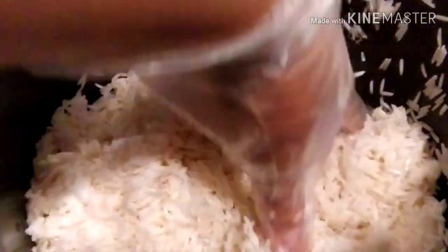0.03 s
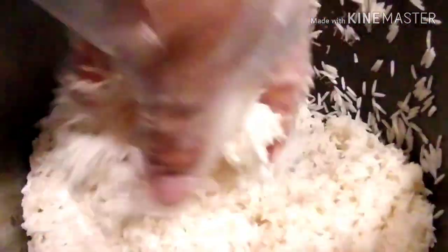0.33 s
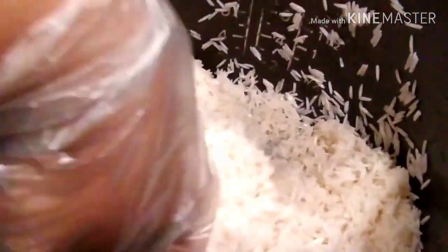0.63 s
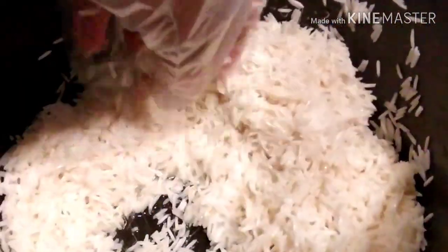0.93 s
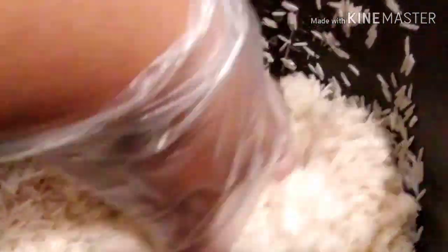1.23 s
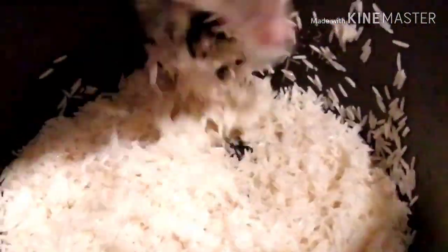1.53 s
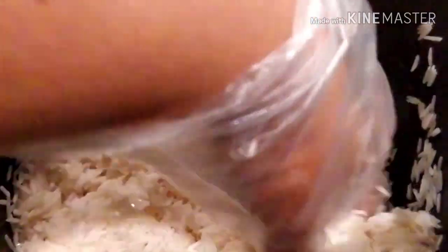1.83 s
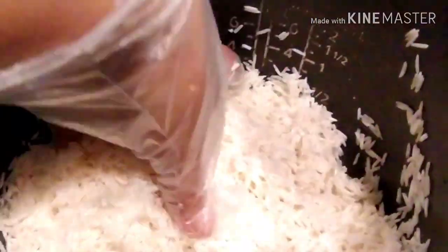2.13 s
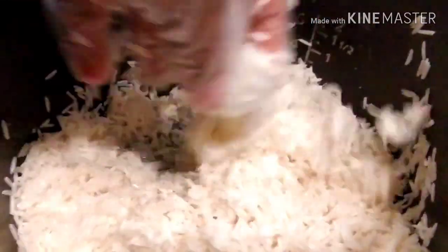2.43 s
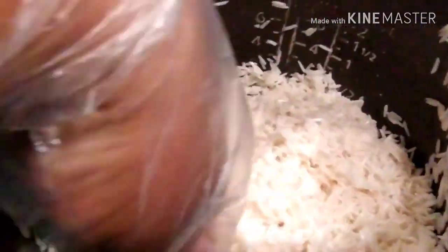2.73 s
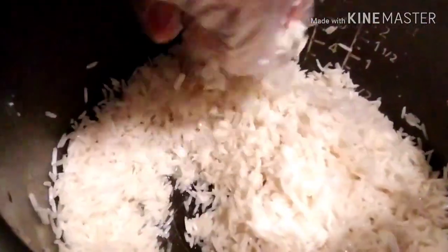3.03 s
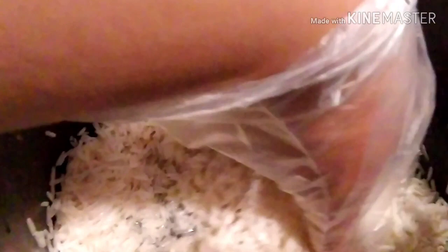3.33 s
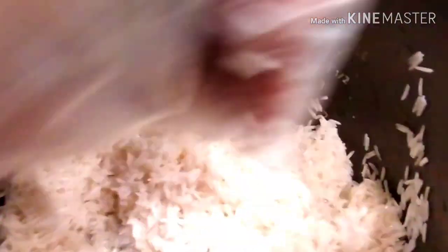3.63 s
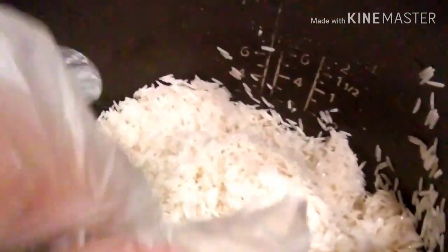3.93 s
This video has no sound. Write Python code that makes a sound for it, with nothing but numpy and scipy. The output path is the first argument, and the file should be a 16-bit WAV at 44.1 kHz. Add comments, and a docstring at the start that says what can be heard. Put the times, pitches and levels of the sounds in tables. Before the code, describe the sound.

Close to the microphone in a quiet room, dry rice hisses and crunches in a metal pot, stroke after stroke. The stirring hand's plastic glove crinkles and snaps, grains trickle down, and the pot occasionally gives a faint, hollow bump.

```python
"""A quiet room, close to a metal pot: a hand in a thin plastic glove stirs and scoops raw rice.
Pushed grains grind and sound the pot's hollow, lifted grains spill back and ring its wall,
glove and husks rustle. All three are dense streams of clicks, reflected inside the pot.
Now and then the hand bumps the pot, the glove snaps, or grains scrape over the metal."""
import sys
import numpy as np
from scipy import signal
from scipy.fft import rfft, irfft, next_fast_len
from scipy.io import wavfile

SR = 44100
rng = np.random.default_rng(int(sys.argv[2]) if len(sys.argv) > 2 else 0)


def generate_wav(signal):
    """Clip the signal to [-1, 1] and save it as 16-bit WAV at the path in sys.argv[1]."""
    frames = np.transpose(np.atleast_2d(signal))
    scaled = np.clip(frames, -1, 1) * 32767
    pcm = np.round(scaled).astype(np.int16)
    wavfile.write(sys.argv[1], SR, pcm)


N = 176400

# one list per hand stroke, before trim: t/s, grind/dB, spill/dB, rustle/dB, rustle left-right/dB
HAND_STROKES = [
    [(0.0, -49.5, -43.5, -31.5, -3), (0.13, -43.5, -44.5, -29.5, -3.0), (0.16, -45.5, -48, -36.5, 1),
     (0.17, -43.5, -45, -33, -4), (0.216, -44.5, -43.5, -31.5, 0), (0.272, -46.5, -47, -36.5, 1),
     (0.278, -49.5, -44, -34, -5), (0.33, -49, -48, -41, -6)],
    [(0.35, -53.5, -48, -36.5, -4), (0.394, -46.5, -45.5, -32, -2), (0.528, -43, -31, -23.5, -4.5),
     (0.598, -44, -39.5, -27.5, -1), (0.626, -44.5, -34.5, -23, -7), (0.672, -43.5, -43.5, -32, -4),
     (0.74, -46, -48, -35, -4), (0.76, -47, -47, -33, -5)],
    [(0.78, -47, -44.5, -31, -6), (0.824, -44, -43, -33, -4), (0.838, -46, -48, -35.5, -8),
     (0.87, -48.5, -39.5, -25.5, -4.5), (0.91, -50.5, -29.5, -23.5, -5), (0.968, -51.5, -46.5, -37, -3),
     (0.986, -55, -58, -32, 0), (1.0, -57, -39, -39, -1.5)],
    [(1.02, -46.5, -38, -31, -6), (1.062, -47.5, -40.5, -30.5, -2), (1.152, -43, -43, -30, -4.0),
     (1.25, -48, -47, -38, -4), (1.298, -45.5, -42.5, -33.5, -5), (1.362, -47, -46, -37, -4),
     (1.384, -47.5, -46, -34, -6), (1.5, -53, -48.5, -37.5, -7)],
    [(1.53, -49, -43.5, -31.5, -3.5), (1.556, -42.5, -32.5, -24, -4), (1.766, -45.5, -41, -32.5, -1.5),
     (1.782, -42, -36.5, -25.5, -3), (1.828, -40.5, -43.5, -29, -2), (1.86, -46.5, -44, -35.5, -4),
     (1.892, -45, -49, -35, -7), (1.9, -51, -51, -35, -8)],
    [(1.93, -44.5, -42, -33, -6), (2.022, -41.5, -35.5, -25.5, -4), (2.096, -44.5, -39, -30.5, -3.5),
     (2.206, -40.5, -41, -27, -4.5), (2.302, -42, -39, -30.5, -4), (2.332, -46.5, -50, -37, -1),
     (2.366, -45.5, -45.5, -31, -3), (2.48, -49, -40, -29, -1)],
    [(2.53, -47.5, -40.5, -30, -9.5), (2.646, -42.5, -30, -28.5, -9), (2.67, -45, -38, -28.5, -6),
     (2.72, -44.5, -38.5, -28.5, -8), (2.788, -49.5, -48, -34.5, -3), (2.848, -47, -47, -33, -7),
     (2.866, -50.5, -44.5, -39, -1.5), (2.9, -46.5, -48.5, -35, 0.0)],
    [(2.93, -46, -48, -31.5, 2), (2.942, -52.5, -48.5, -31.5, 0.0), (3.018, -43, -38.5, -28, -1),
     (3.076, -49.5, -46.5, -36.5, -2), (3.116, -40, -41, -27, 2), (3.14, -40, -38, -26, 2),
     (3.282, -45.5, -44, -31.5, -3.5), (3.41, -53, -52, -41, -3)],
    [(3.44, -56, -52, -38.5, -1), (3.488, -46.5, -47, -35.5, -5), (3.588, -54.5, -49, -36.5, 1),
     (3.594, -53, -49, -35, -4), (3.664, -42.5, -36, -29.5, -7), (3.712, -48.5, -41.5, -30, -6.5),
     (3.79, -46, -35.5, -31.5, -9), (3.81, -49, -47, -35, -10)],
    [(3.85, -51.5, -42, -36, -6.5), (3.86, -51.5, -43, -31, -9), (3.9, -42, -37, -28, -7),
     (3.924, -39, -31, -23, -11), (3.952, -37.5, -38.5, -28.5, -10), (3.972, -51.5, -42.5, -36, -4.0),
     (3.994, -47, -38.5, -30, -3), (4.0, -45, -42, -31, -6)],
]
# hand against pot, before trim: t/s, level/dB, length/s
POT_BUMPS = [(0.13, -42, 0.023), (0.657, -45.5, 0.061), (1.575, -38, 0.024), (1.799, -49, .025),
             (2.708, -41, 0.023), (3.109, -29, 0.017), (3.899, -38, 0.045)]
# glove and grain snaps, before trim: t/s, level/dB, length/s, left-right/dB
GLOVE_SNAPS = [(0.462, -22, 0.0037, 1), (0.488, -16.5, .003, 3), (0.52, -21, .0029, 14),
               (0.618, -19.5, 0.0093, -8), (0.87, -21.5, 0.0047, 7), (1.0121, -19, .004, 1),
               (1.5569, -20, .0053, 1), (1.6015, -18.5, .005, 1), (1.628, -19.5, .003, 0),
               (1.641, -16, .004, -1), (1.651, -19, .0016, 0), (2.03, -15.5, .002, 0),
               (2.1994, -17.5, .0016, -3), (2.5112, -12, .004, 1), (2.595, -13, .0045, 0),
               (2.613, -14, 0.0034, 0), (2.624, -13, 0.0027, -2), (2.643, -22, 0.0046, -2),
               (2.759, -23, .001, 0), (2.8422, -14.5, .0013, -5), (2.8765, -25, .001, 0),
               (3.1328, -14.5, .0019, 2), (3.242, -18, .001, 3), (3.5992, -15.5, .0012, -1),
               (3.659, -22, 0.0027, -3), (3.7855, -20, 0.0033, -2), (3.8235, -20, 0.0038, -8.5),
               (3.919, -17, 0.0046, 0), (3.948, -19, 0.0017, -4)]
# grains dragged on metal, before trim: t/s, level/dB, length/s
POT_SCRAPES = [(0.54, -44, 0.07), (1.139, -30, 0.0053), (1.568, -35, 0.02), (1.696, -39, .014),
               (1.802, -38, 0.025), (3.658, -40, 0.014), (3.892, -53, 0.013)]
# source spectra: f/Hz, relative level/dB
GRIND_SPECTRUM = [(60, -22), (140, -13), (230, -3.5), (400, -3.5), (650, -10), (1000, -1), (1300, -3.5),
                  (1600, -0.5), (2000, 1.5), (2750, 5), (3500, -7), (6000, -6.5), (15000, -36)]
SPILL_SPECTRUM = [(1200, -42), (2400, -1.5), (2900, 3), (3600, 0), (4600, 1.5), (5300, -1.5), (6300, 1.5),
                  (9000, 3), (12000, -16), (15500, -17)]
RUSTLE_SPECTRUM = [(3000, -33.5), (6000, -12.5), (7200, -6), (8200, 2), (9400, 0), (10800, -2),
                   (12000, -12), (13000, -10.5), (15500, -18)]
ROOM_SPECTRUM = [(25, -0.5), (50, -7.5), (100, -11), (200, -6.5), (500, -14.5), (2000, -14.5),
                 (8000, -27.5), (15000, -26)]
BUMP_SPECTRUM = [(60, -26), (150, -9), (230, 3), (350, 1.5), (480, -3), (650, -18), (1000, -16.5),
                 (2000, -52), (8000, -65)]
SNAP_SPECTRUM = [(500, -24), (2500, -29), (6000, -9.5), (8000, 2), (9500, 1.5), (11000, -9.5),
                 (13000, -16.5), (15500, -29)]
SCRAPE_SPECTRUM = [(300, -18), (700, -8.5), (1100, 1.5), (1700, 1), (2400, -2), (4000, -17)]
# stereo balance: f/Hz, left-right/dB
GRIND_PAN = [(200, -2), (450, -1.5), (800, -1), (1000, 0.5), (1600, 4), (3000, -1.5), (6000, -2.5)]
SPILL_PAN = [(3000, 3.5), (4500, -0.5), (6000, -8), (9000, 0), (13000, 16.5)]
# resonances of pot air, metal wall and microphone ports: f/Hz, width/Hz, gain/dB
HOLLOW_MODES = [(362, 10, -4), (454, 34.7, 11), (507, 47, 6), (807, 10, 1.5), (999, 80, 4.5),
                (1150, 17, -13)]
WALL_MODES = [(2924, 44, 0.5), (3810, 100, 0), (4620, 360, -5.5), (4646, 35, -4), (5815, 70, 1)]
LEFT_PORT_MODES = [(10840, 2700, 6)]
RIGHT_PORT_MODES = [(9280, 680, 3.6)]

GRIND_TRIM_DB, RUSTLE_TRIM_DB, BUMP_TRIM_DB, SNAP_TRIM_DB, SCRAPE_TRIM_DB = 1, -0.3, -7, 2, -5
SLIPS_PER_S, SLIP_SPREAD_DB = 330, 2
POT_T60_S, HAND_MOVE_S = 0.028, 0.1606
PORT_LAG_SPREAD_S = 0.00017


def undb(db):
    """Decibels to gain."""
    return 10 ** (np.asarray(db) / 20)


def pan(db):
    """Left and right gains for a level difference."""
    return undb(np.array([[.5], [-.5]]) * db)


def db_at(points, hz):
    """Interpolate (f/Hz, level/dB) points over log frequency."""
    point_hz, point_db = np.array(points, float).T
    return np.interp(np.log(hz + 1), np.log(point_hz), point_db)


def filtered(x, response):
    """Apply a gain given as a function of frequency."""
    size = next_fast_len(N + SR // 4)
    hz = np.fft.rfftfreq(size, 1 / SR)
    return irfft(rfft(x, size) * response(hz), size)[..., :N]


def colour(x, spectrum):
    """Impose a smooth spectrum."""
    return filtered(x, lambda f: undb(db_at(spectrum, f)))


def ring(x, modes):
    """The sound plus the resonances it excites."""
    return filtered(x, lambda f: 1 + sum(undb(db) * 1j * f * width / (hz ** 2 - f ** 2 + 1j * f * width)
                                         for hz, width, db in modes))


def unit_rms(x, band_hz=(0, SR)):
    """Scale the channel mean to rms 1 within a band."""
    in_band = filtered(x.mean(axis=0), lambda f: (f >= band_hz[0]) & (f <= band_hz[1]))
    return x / np.sqrt(np.mean(in_band ** 2))


def grain_contacts(rate_per_s, spread_db):
    """Uneven clicks: grains jam and slip in clumps; each contact's place sets its left-right lag."""
    clicks = undb(spread_db * np.clip(rng.standard_normal(N), -2.6, 2.6))
    clicks *= rng.choice([-1, 1], N)
    clicks *= rng.random(N) < rate_per_s / SR
    clump = np.cumsum(rng.random(N) < SLIPS_PER_S / SR)
    clicks *= undb(SLIP_SPREAD_DB * np.clip(rng.standard_normal(N), -2, 2))[clump]
    lag = np.round(rng.standard_normal(N) * PORT_LAG_SPREAD_S * SR / 2).astype(int)
    return np.array([np.bincount((np.arange(N) + side * lag) % N, clicks, N) for side in (1, -1)])


def pot_echoes(clicks, echo_db=-3):
    """Add quick reflections in the pot; their pattern shifts as the hand moves."""
    decay = undb(-60 * np.arange(SR // 20) / SR / POT_T60_S)
    hop = int(HAND_MOVE_S * SR)
    out = clicks.copy()
    for centre in range(0, N + hop, hop):
        span = np.arange(max(centre - hop, 0), min(centre + hop, N))
        echo = rng.standard_normal((2, len(decay))) * decay
        echo *= undb(echo_db) / np.linalg.norm(echo, axis=1, keepdims=True)
        crossfade = np.cos(np.pi / 2 * (span - centre) / hop)
        tail = signal.fftconvolve(clicks[:, span] * crossfade, echo, axes=1)[:, :N - span[0]]
        out[:, span[0]:span[0] + tail.shape[1]] += tail
    return out


def mic_ports(x):
    """Each microphone port adds its own treble resonance."""
    return np.array([ring(x[0], LEFT_PORT_MODES), ring(x[1], RIGHT_PORT_MODES)])


def grinding(level_db):
    """Grains pushed past each other sound the pot's hollow."""
    clicks = pot_echoes(grain_contacts(rate_per_s=3800, spread_db=2))
    hollow = ring(colour(clicks, GRIND_SPECTRUM), HOLLOW_MODES)
    panned = filtered(hollow, lambda f: pan(db_at(GRIND_PAN, f)))
    return unit_rms(mic_ports(panned), band_hz=(200, 2400)) * undb(level_db + GRIND_TRIM_DB)


def spilling(level_db):
    """Grains slide and fall on the heap and ring the metal wall."""
    clicks = pot_echoes(grain_contacts(rate_per_s=4000, spread_db=1))
    wall = ring(colour(clicks, SPILL_SPECTRUM), WALL_MODES)
    panned = filtered(wall, lambda f: pan(db_at(SPILL_PAN, f)))
    return unit_rms(mic_ports(panned), band_hz=(2800, 7000)) * undb(level_db)


def rustling(level_db, pan_db):
    """Grains tick brightly against the thin glove."""
    clicks = pot_echoes(grain_contacts(rate_per_s=3200, spread_db=1.5))
    ticks = mic_ports(colour(clicks, RUSTLE_SPECTRUM))
    ticks /= ticks.std(axis=1, keepdims=True)
    return unit_rms(ticks, band_hz=(7000, 15000)) * undb(level_db + RUSTLE_TRIM_DB) * pan(pan_db)


def room(t, noise_db=-55, hum_hz=102.8, hum_db=-69):
    """Quiet room noise, partly common to both channels, and a faint hum."""
    air = rng.standard_normal(N) + 1.04 * rng.standard_normal((2, N))
    hum = np.sqrt(2) * np.sin(2 * np.pi * hum_hz * t)
    return undb(noise_db) * unit_rms(colour(air, ROOM_SPECTRUM)) + undb(hum_db) * hum


def hand_pressure(t, pushes):
    """Each push peaks at half its length, then fades."""
    envelope = 0
    for start_s, level_db, length_s in pushes:
        age = np.maximum(t - start_s, 0) / (length_s / 2)
        envelope += undb(level_db) * age * np.exp(1 - age)
    return envelope


def bumps(t):
    """The hand bumps the pot through the rice; the hollow booms."""
    noise = unit_rms(colour(rng.standard_normal((1, N)), BUMP_SPECTRUM))
    boom = ring(noise * hand_pressure(t, POT_BUMPS), HOLLOW_MODES)
    return undb(BUMP_TRIM_DB) * boom * pan(db=-3)


def snaps(t):
    """Glove and grains snap: click clusters a few milliseconds long."""
    gates = sum(undb(level_db) * pan(pan_db) * ((t >= start_s) & (t < start_s + length_s))
                for start_s, level_db, length_s, pan_db in GLOVE_SNAPS)
    clicks = pot_echoes(gates * rng.choice([-1, 1], (2, N)), echo_db=-8)
    return undb(SNAP_TRIM_DB) * mic_ports(colour(clicks, SNAP_SPECTRUM))


def scrapes(t):
    """Fingers drag grains over the metal and ring the hollow's upper modes."""
    friction = colour(rng.standard_normal((2, N)), SCRAPE_SPECTRUM)
    drag = unit_rms(ring(friction, HOLLOW_MODES))
    return undb(SCRAPE_TRIM_DB) * drag * hand_pressure(t, POT_SCRAPES)


def scene():
    """Strokes drive three grain streams; snaps, scrapes, bumps and the room join them."""
    t = np.arange(N) / SR
    stroke_s, *columns = np.vstack(HAND_STROKES).T
    grind_db, spill_db, rustle_db, pan_db = (np.interp(t, stroke_s, column) for column in columns)
    rice = grinding(grind_db) + spilling(spill_db) + rustling(rustle_db, pan_db)
    return rice + snaps(t) + scrapes(t) + bumps(t) + room(t)


def record(dry):
    """The phone cuts the top treble with a steep low-pass."""
    cutoff_hz = 15600
    return signal.sosfilt(signal.ellip(10, .2, 80, cutoff_hz, fs=SR, output="sos"), dry)


dry = scene()
out = record(dry)
generate_wav(out)
```